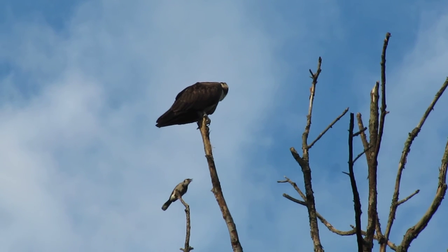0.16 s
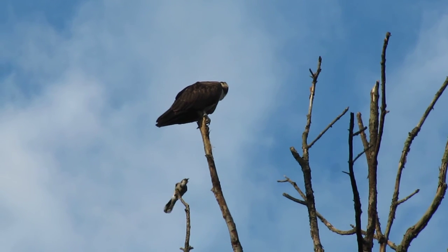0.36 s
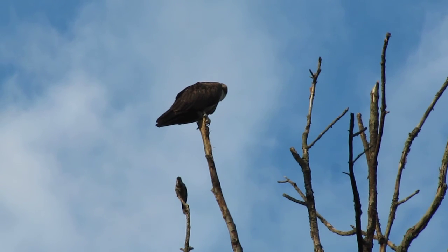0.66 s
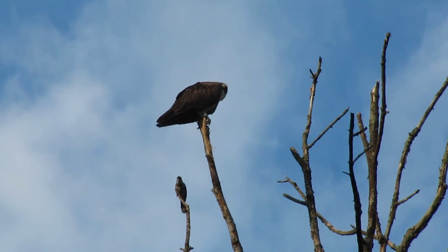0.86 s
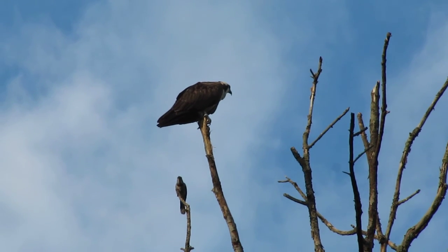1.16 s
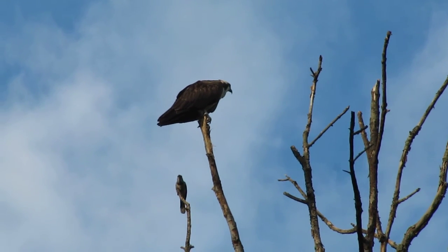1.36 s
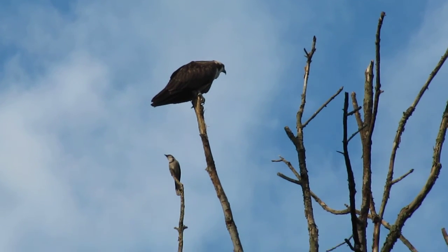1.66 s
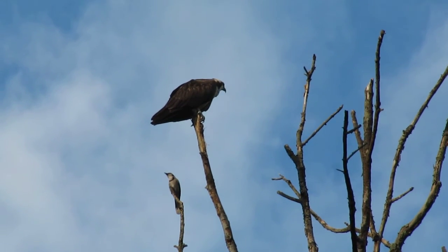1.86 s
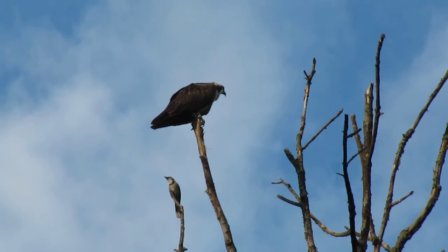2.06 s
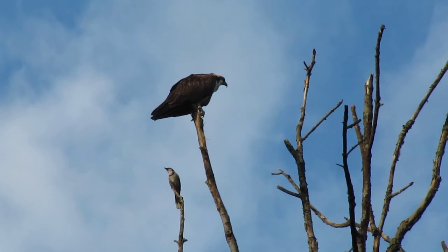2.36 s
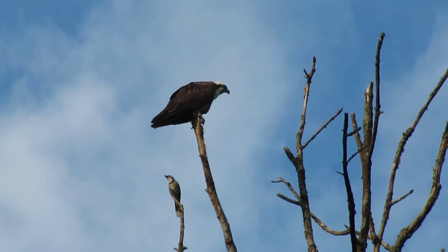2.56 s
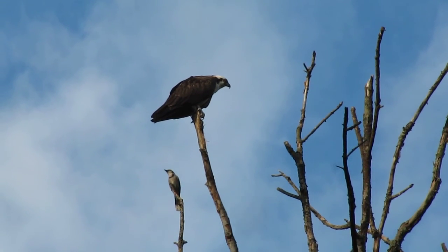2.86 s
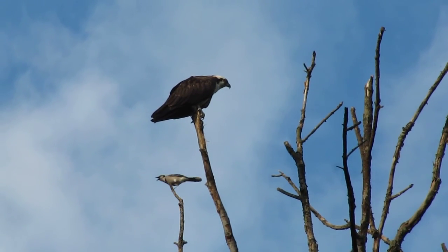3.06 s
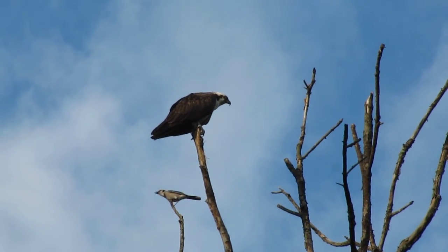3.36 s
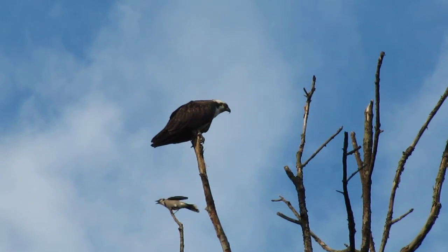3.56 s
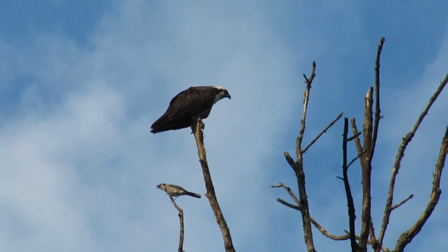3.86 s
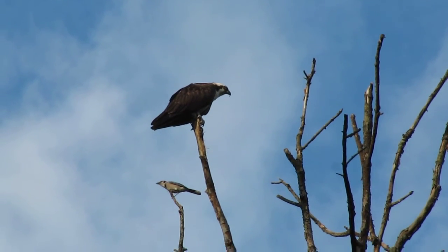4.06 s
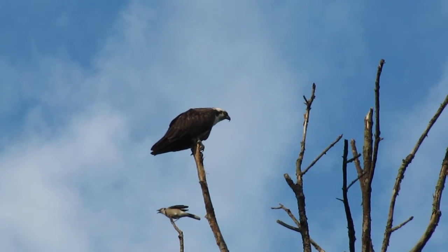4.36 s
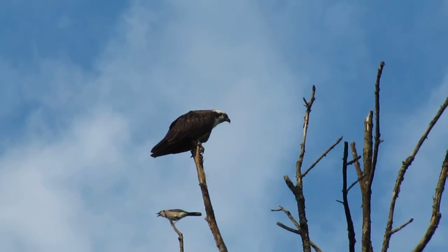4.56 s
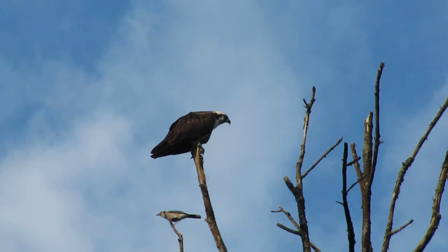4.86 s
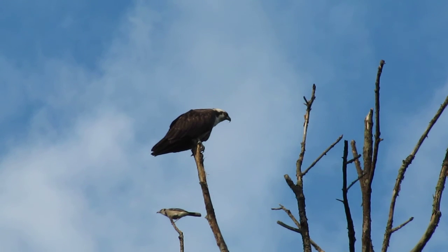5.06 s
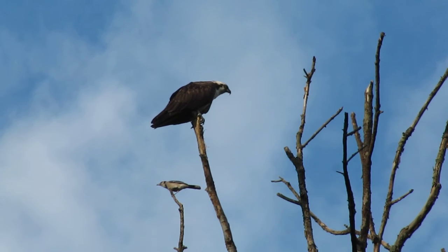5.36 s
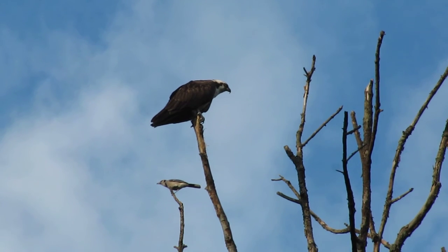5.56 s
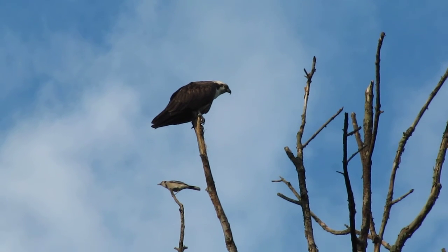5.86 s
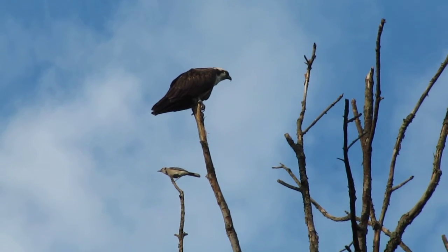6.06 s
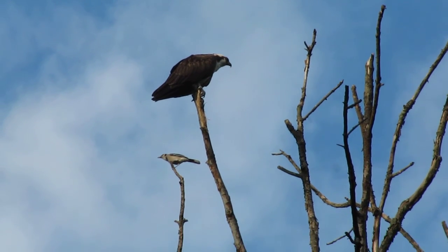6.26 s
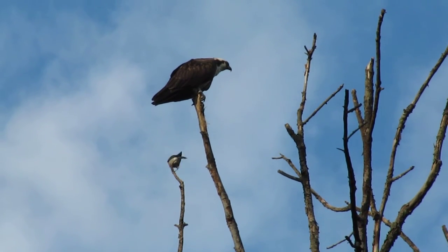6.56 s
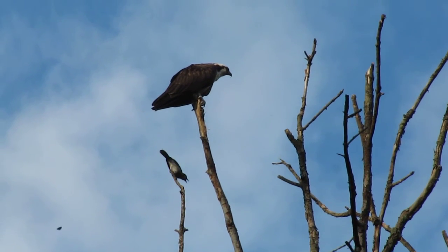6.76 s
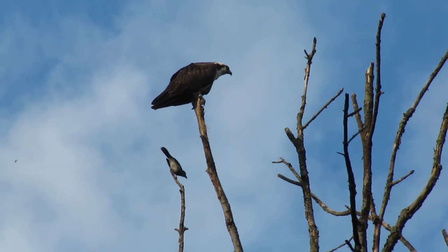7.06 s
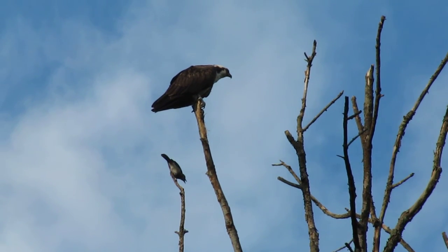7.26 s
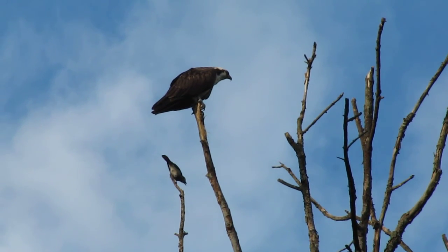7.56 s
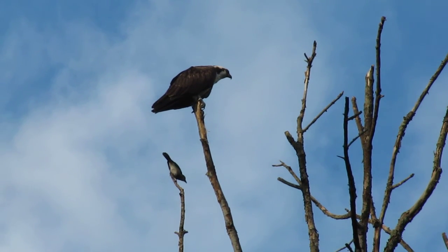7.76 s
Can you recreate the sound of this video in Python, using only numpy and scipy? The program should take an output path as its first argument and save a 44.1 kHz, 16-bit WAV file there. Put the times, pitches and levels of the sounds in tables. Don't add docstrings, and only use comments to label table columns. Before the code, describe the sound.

A near jay gives loud, grating, down-sliding screams in spaced bursts, a duller jay answers from the woods, with quiet outdoor rumble behind.

```python
import sys
import numpy as np
from scipy import signal
from scipy.fft import rfft, irfft
from scipy.io import wavfile

SR = 44100
rng = np.random.default_rng(int(sys.argv[2]) if len(sys.argv) > 2 else 0)


def put_to_file(sound):
    columns = np.atleast_2d(sound).T
    safe = np.clip(columns, -1, 1)
    whole_steps = np.round(safe * 32767)
    wavfile.write(sys.argv[1], SR, whole_steps.astype(np.int16))


def voltage_ratio(level):
    return 10 ** (np.asarray(level, float) / 20)


N = 348390


def rms_one(x):
    return x / np.sqrt(np.mean(x ** 2) + 1e-20)


def at_hz(points, hz):
    curve_hz, curve_db = np.array(points).T
    return np.interp(np.log(np.maximum(hz, 1)), np.log(curve_hz), curve_db)


def coloured(points, size):
    hz = np.fft.rfftfreq(size, 1 / SR)
    spectrum = rfft(rng.standard_normal(size)) * voltage_ratio(at_hz(points, hz))
    return rms_one(irfft(spectrum, size))


def drift(rate_hz, size):
    r = np.exp(-2 * np.pi * rate_hz / SR)
    noise = rng.standard_normal(size + 8000)
    return rms_one(signal.lfilter([1], [1, -2 * r, r * r], noise)[8000:])


def ring(x, hz, t60):
    r, w = voltage_ratio(-60 / (t60 * SR)), 2 * np.pi * hz / SR
    return signal.lfilter([0, np.sin(w)], [1, -2 * r * np.cos(w), r * r], x)


def add(out, piece, s):
    at = round(s * SR)
    piece = piece[max(-at, 0):N - at]
    out[max(at, 0):max(at, 0) + len(piece)] += piece


def syrinx_rate(call, top_s, swoop, fray, age):
    _, length, top_hz, sag, _ = call
    turn_s = 0.01355
    climb = 30.85 * np.clip(1 - age / top_s, 0, 1) ** 2
    rate = top_hz - climb - sag * turn_s * np.logaddexp(0, (age - top_s) / turn_s)
    rate = rate + 350 * np.clip(age - top_s, 0, length) * (length - age).clip(0)
    rate = rate * (1 - swoop * np.exp(-age / 0.0056))
    rate = rate - 17.86 * fray
    slow_wobble = .0022 * drift(25, len(age))
    roughness = (.003 + .006 * age + .008 * fray) * drift(350, len(age))
    return rate * (1 + slow_wobble + roughness)


def voice_lines(rate, throat, half_db, quarter_db, fade_db, fray, age):
    size = len(age)
    phase = np.pi * np.cumsum(rate) / SR
    doubling = np.clip((age - .015) / .04, 0, 1) * voltage_ratio(-9 * np.exp(-age / .1))
    off_peak = np.clip(((age - .13) / .07) ** 2, 0, 1 - fray / 2)
    lines = 0
    for k in range(3, 38):
        if k % 2:
            line_db = quarter_db - 6 * max(8 - k, 0) - 14 * off_peak
            share = doubling * voltage_ratio(line_db + 3 * np.minimum(drift(6, size), 1))
        elif k % 4:
            line_db = min(half_db + 5 * np.log2(k / 10), 0)
            share = doubling * voltage_ratio(line_db + 2 * drift(5, size))
        else:
            share = 1
        depth_db = fade_db * (.3 + min(max(k - 8, 0), 14) / 4.5)
        fade = depth_db * np.minimum(.8 * drift(12, size) + .7 * drift(70, size), 1.2)
        tone = np.sin(k * phase + rng.uniform(0, 2 * np.pi))
        lines = lines + share * voltage_ratio(at_hz(throat, k * rate / 2) + fade) * tone
    return lines


def scream(call, manner, quarter_db, voice, tract, fade_db, swoop, size=24000):
    _, length, _, _, db = call
    top_s, attack_s, rasp_db, tilt_db, fray_s = manner
    half_db, breath_db, onset_db, tiring_db = voice
    throat = [(f, g + tilt_db * np.log2(f / 3300)) for f, g in tract]
    age = np.arange(size) / SR
    fray = np.clip(1 - (length - .03 - age) / fray_s, 0, 1) ** 1.5

    rate = syrinx_rate(call, top_s, swoop, fray, age)
    lines = voice_lines(rate, throat, half_db, quarter_db, fade_db, fray, age)
    lines = lines / np.sqrt(np.mean(lines[age < length] ** 2))
    flutter = 1 - 0.37 * fray + 0.39 * fray * drift(300, size)

    airy = [(f, g + 10.5 * np.log2(f / 3300)) for f, g in throat]
    puff_db = 7 * np.exp(-((age - .04) / .03) ** 2)
    breath = coloured(airy, size) * voltage_ratio(breath_db + puff_db)
    raspy = [(f, .8 * g - 14 * max(np.log2(2600 / f), 0)) for f, g in throat]
    rasp = coloured(raspy, size) * fray * voltage_ratio(rasp_db + 2.5 * drift(220, size))

    effort_db = db + onset_db * np.clip(1 - age / attack_s, 0, 1) - tiring_db * age
    effort_db = effort_db + 2.05 * np.clip(age / 0.19, 0, 1) ** 2 * drift(10.4, size)
    effort_db = effort_db - 15.5 * np.clip(1 - (length - age) / 0.051, 0, 1)
    start = np.clip(age / 0.00059, 0, 1)
    stop = np.exp(-np.clip(age - length, 0, 1) / 0.0038)
    return voltage_ratio(effort_db) * start * stop * (lines * flutter + breath + rasp)


def jay(calls, manners, quarters_db, voice, tract, fade_db, swoop):
    out = np.zeros(N)
    for call, manner, quarter_db in zip(calls, manners, quarters_db):
        add(out, scream(call, manner, quarter_db, voice, tract, fade_db, swoop), call[0])
    return out


def near_jay():
    # (start [s], length [s], highest half rate of the syrinx [Hz], sag [Hz per s], level [dB])
    near_calls = [
        (-.13, 0.36, 862, 335.3, -18),
        (.446, 0.35, 887, 368.7, -18),
        (3.053, 0.41, 860.4, 348.5, -21),
        (3.656, 0.4, 876.8, 370.4, -20.5),
        (4.464, 0.37, 874.4, 392.3, -20),
        (6.666, 0.42, 857.8, 328, -20),
        (7.331, 0.38, 871.4, 287.8, -20.5),
    ]
    # (time to top pitch [s], attack [s], closing rasp [dB], brightness [dB per octave], fraying [s])
    near_manner = [(.06, .04, -5.5, 0.7, 0.15), (.07, 0.03, 1.5, 2.5, 0.055), (0.074, 0.026, -4, 1.7, 0.15),
                   (0.051, 0.026, -8, 1.8, 0.14), (0.073, .03, -4.5, 1.7, 0.088),
                   (0.082, 0.075, -4.5, -0.05, 0.2), (.035, 0.037, -6, 0.1, 0.15)]
    near_quarter_db = [-24, -15, -17, -24, -20, -26, -13]
    # (half lines [dB], breath [dB], onset [dB], tiring [dB per s])
    near_voice = (-9, -20, -11, 10.5)
    # (frequency [Hz], level [dB])
    near_throat = [(800, -37.5), (1700, -23), (2100, -11), (2600, -4), (3300, 3.5), (3750, 4), (4250, -3),
                   (5100, -12), (5900, -8.5), (6800, -10), (8600, -13.5), (10300, -27), (12500, -35.5),
                   (16000, -62)]
    return jay(near_calls, near_manner, near_quarter_db, near_voice, near_throat, fade_db=1.7, swoop=0.3)


def far_jay():
    # (start [s], length [s], highest half rate of the syrinx [Hz], sag [Hz per s], level [dB])
    far_calls = [
        (.13, 0.33, 825, 269, -28.5),
        (.74, 0.32, 850, 416, -32.5),
        (4.128, 0.34, 851.4, 494.5, -25.5),
        (4.92, 0.32, 857.8, 513.4, -27),
        (7.71, 0.26, 835, 375, -29.5),
    ]
    # (time to top pitch [s], attack [s], closing rasp [dB], brightness [dB per octave], fraying [s])
    far_manner = [(.06, 0.029, -26, -4, 0.054), (.07, 0.09, -20, -7.5, 0.057), (0.08, 0.028, -14, 0, 0.093),
                  (.05, 0.064, -20, -0.5, 0.16), (0.0224, 0.056, 0, 0, 0.12)]
    far_quarter_db = [-22, -18, -8, -8, -12]
    # (half lines [dB], breath [dB], onset [dB], tiring [dB per s])
    far_voice = (-6.5, -18, -9, 25)
    # (frequency [Hz], level [dB])
    far_throat = [(800, -26), (1650, -28), (2100, -6), (2500, -9.5), (3400, -0.5), (3800, -8.5),
                  (5100, -18), (5900, -17.5), (6800, -18.5), (8600, -23.5), (9500, -18.5), (12000, -54),
                  (14000, -58), (16000, -66)]
    bird = jay(far_calls, far_manner, far_quarter_db, far_voice, far_throat, fade_db=2.4, swoop=0.059)
    return bird * voltage_ratio(-5.0)


def trees(x):
    trunks_t60_s, woods_t60_s = .25, 1.15
    trunks_db, woods_db, leaf_cut_hz = -6, -14, 14000
    t = np.arange(int(1.6 * SR)) / SR
    bright, far = rng.standard_normal((2, len(t)))
    dull = signal.sosfilt(signal.butter(1, leaf_cut_hz, fs=SR, output="sos"), far)
    quick = bright * voltage_ratio(-60 * t / trunks_t60_s) * np.clip(t / 0.022, 0, 1)
    slow = dull * voltage_ratio(-60 * t / woods_t60_s) * np.clip(t / 0.0067, 0, 1)
    tail = voltage_ratio(trunks_db) * rms_one(quick) + voltage_ratio(woods_db) * rms_one(slow)
    return signal.fftconvolve(x, tail / np.sqrt(len(t)))[:N]


def air():
    # (frequency [Hz], level [dB per Hz])
    air_curve = [(12, -53), (20, -2.5), (133, -4), (166, -4), (440, -13), (492, -12.5), (687, -17),
                 (1340, -21), (2410, -26.5), (3180, -27), (5110, -32), (7970, -33), (15600, -42)]
    return voltage_ratio(-49 + 1.2 * drift(0.33, N)) * coloured(air_curve, N)


def insects():
    middle_hz, width_hz = 7950, 260
    edges_hz = [middle_hz - width_hz / 2, middle_hz + width_hz / 2]
    band = signal.butter(1, edges_hz, "band", fs=SR, output="sos")
    chorus = rms_one(signal.sosfilt(band, rng.standard_normal(N)))
    return chorus * voltage_ratio(-75 + 1.0 * drift(8.9, N))


def engines():
    # (middle [s], half length [s], frequency [Hz], level [dB])
    engine_hums = [
        (1.9, 1, 110.4, -58),
        (3.25, 0.8, 110.2, -52.5),
        (4.8, 0.59, 116, -57),
        (7.1, 0.9, 111.6, -59),
        (.25, 0.077, 305, -54.5),
        (1.6, 0.41, 288.8, -55.5),
        (4.4, .2, 297, -54.5),
    ]
    t = np.arange(N) / SR
    out = 0
    for s, half, hz, db in engine_hums:
        wandering_hz = hz * (1 + .015 * drift(3, N))
        hum = np.sin(2 * np.pi * np.cumsum(wandering_hz) / SR)
        swell = np.exp(-((t - s) / half) ** 2)
        out = out + voltage_ratio(db + 4.2 * drift(4.9, N)) * swell * hum
    return out


def ticks():
    # (time [s], crack [dB], knock [dB], shell pitch [Hz], shell [dB])
    tick_list = [(1.194, -45, -53, 2457, -33), (1.2115, -25.5, -52, 2420, -29.5),
                 (1.2234, -44, -56, 728, -37), (1.3838, -48, -52, 610, -52), (1.3937, -27.5, -44, 847, -44),
                 (1.5304, -51, -45, 720, -42), (1.5359, -37, -35.5, 950, -36),
                 (1.6078, -31.5, -35.5, 2830, -36), (1.618, -35, -42, 2160, -54),
                 (1.6294, -45, -49, 600, -52), (1.8966, -42, -49, 797, -41), (1.904, -30, -34.5, 726, -30),
                 (5.2046, -26, -39, 2850, -37), (5.7324, -36, -45.5, 2340, -41),
                 (5.8287, -46, -56, 848, -58)]
    out, t = np.zeros(N), np.arange(1500) / SR
    for s, crack_db, knock_db, shell_hz, shell_db in tick_list:
        crack_hz = 6850 + 76 * (crack_db + 52.5)
        burst = rng.standard_normal((3, 1500))
        crack = ring(ring(burst[0] * np.exp(-t / .0004), crack_hz, .001), crack_hz, .0007)
        knock = ring(ring(burst[1] * np.exp(-t / 0.0022), 4300, 0.00034), 4600, 0.00024)
        shell = ring(burst[2] * np.exp(-t / 0.0027), shell_hz, 0.0045)
        for part, db in ((crack, crack_db), (knock, knock_db + 7.5), (shell, shell_db + 0.13)):
            add(out, voltage_ratio(db) * part / np.abs(part).max(), s)
    return out


def chirps_and_rustles():
    # (start [s], length [s], low edge [Hz], high edge [Hz])
    blur_bands = [
        (2.31, .16, 3980, 4120),
        (2.3, .2, 4440, 4560),
        (2.34, .16, 3200, 3450),
        (2.54, .22, 5120, 5260),
        (2.55, .45, 3700, 5000),
        (1.64, .2, 8300, 10000),
        (1.64, .16, 7000, 8100),
        (1.33, .065, 7500, 13000),
        (5.75, .12, 8000, 11000),
    ]
    blur_levels = [-66, -68, -63, -70, -66, -62, -64, -58, -70]
    size = 20000
    out, t = np.zeros(N), np.arange(size) / SR
    for (s, length, low_hz, high_hz), db in zip(blur_bands, blur_levels):
        band = signal.butter(2, [low_hz, high_hz], "band", fs=SR, output="sos")
        noise = rms_one(signal.sosfilt(band, rng.standard_normal(size)))
        swell = np.sin(np.pi * (t / length).clip(0, 1) ** 0.53) ** .5
        add(out, voltage_ratio(db + 1.7 * drift(25, size)) * swell * noise, s)
    return out


def scene():
    near = near_jay()
    far = far_jay()
    scattered = trees(near + 1.4 * far)
    birds = voltage_ratio(-1.87) * near + far + scattered
    surroundings = air() + insects() + engines() + ticks() + chirps_and_rustles()
    return (birds + surroundings)[None]


def top_cut(x):
    return signal.sosfilt(signal.butter(12, 15710, fs=SR, output="sos"), x)


def record(dry):
    return top_cut(dry)


dry = scene()
out = record(dry)
put_to_file(out)
```